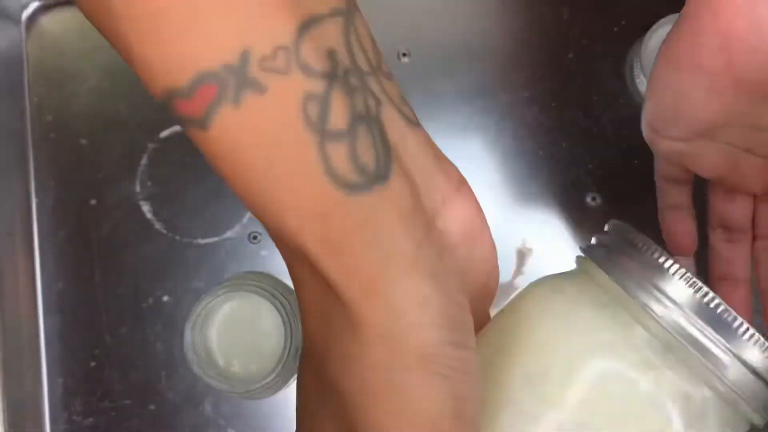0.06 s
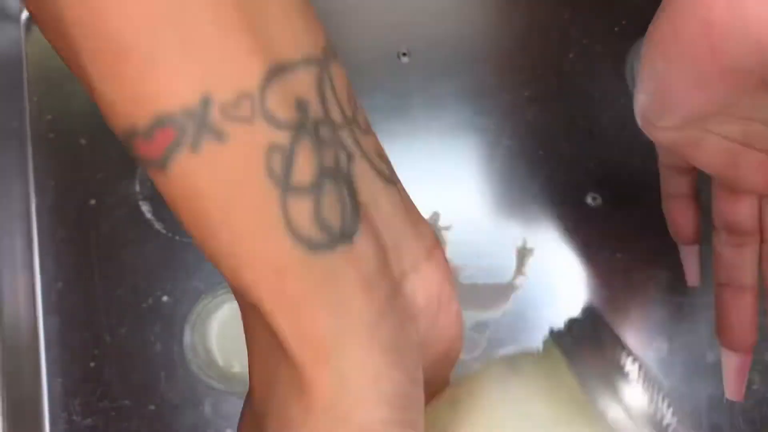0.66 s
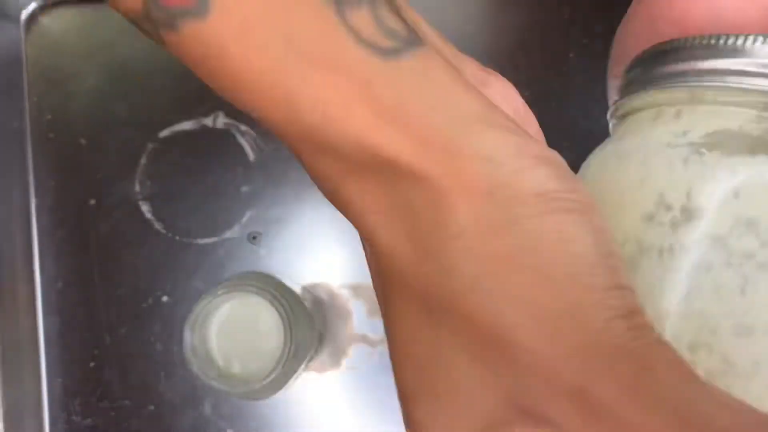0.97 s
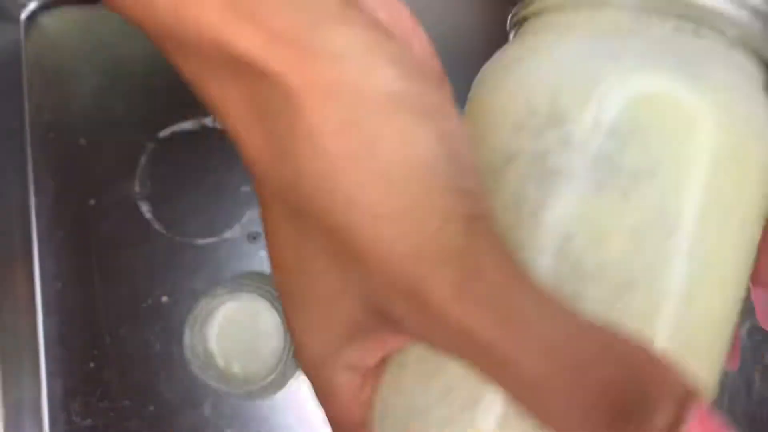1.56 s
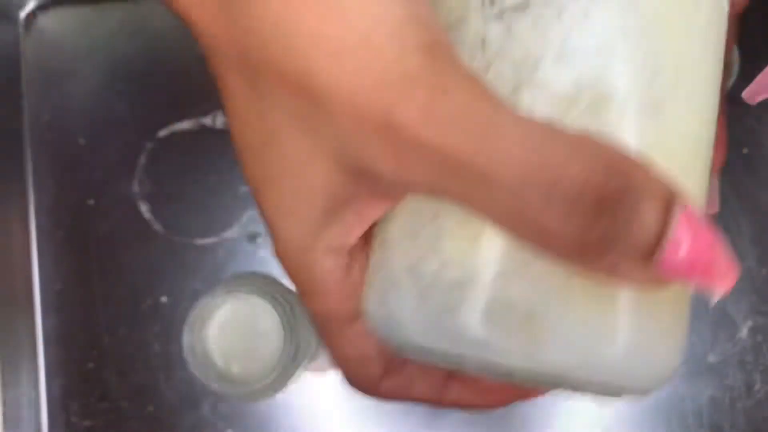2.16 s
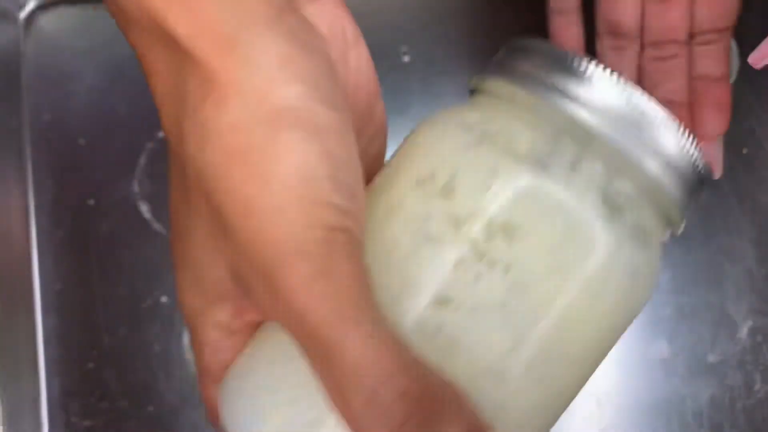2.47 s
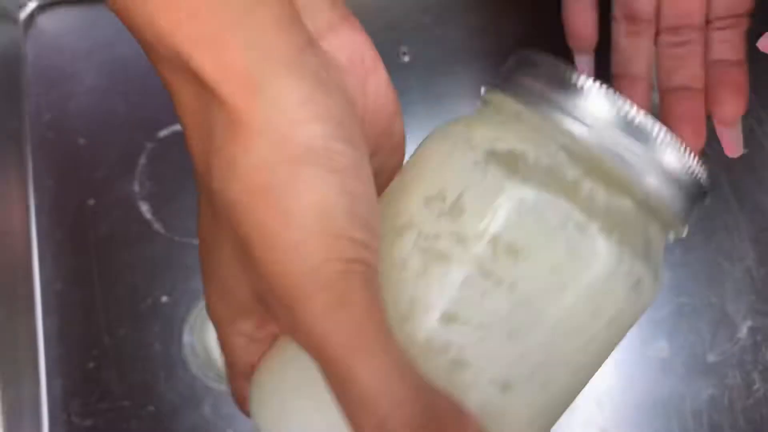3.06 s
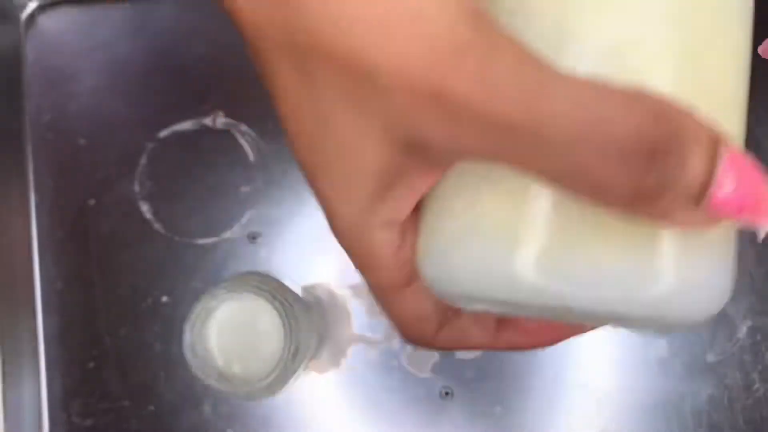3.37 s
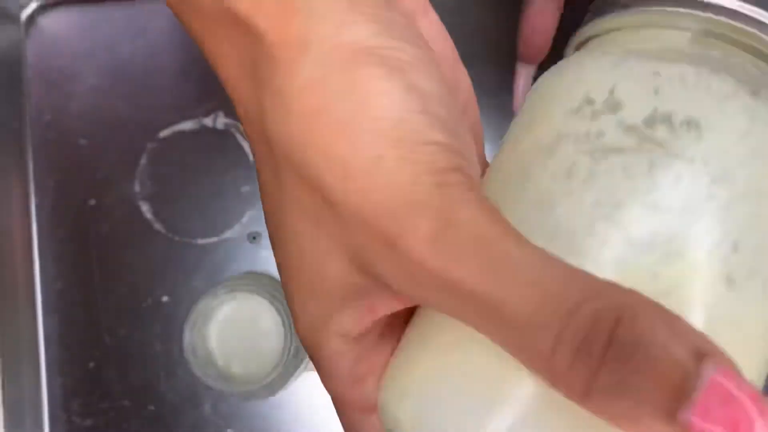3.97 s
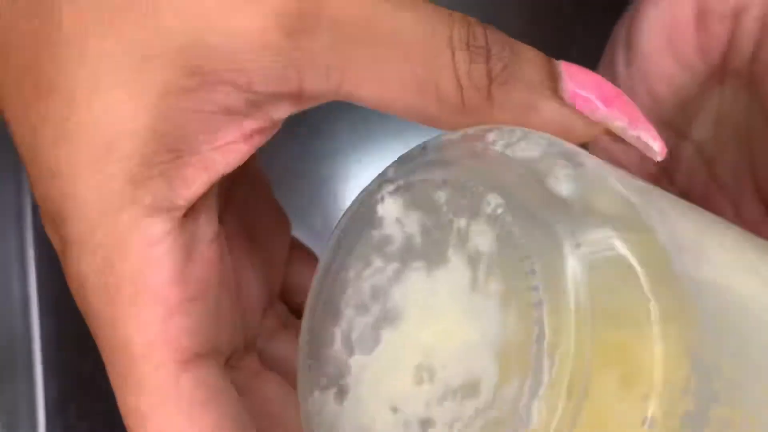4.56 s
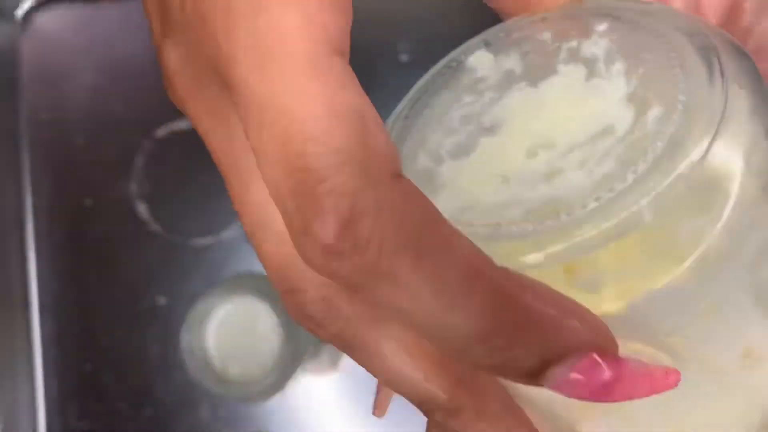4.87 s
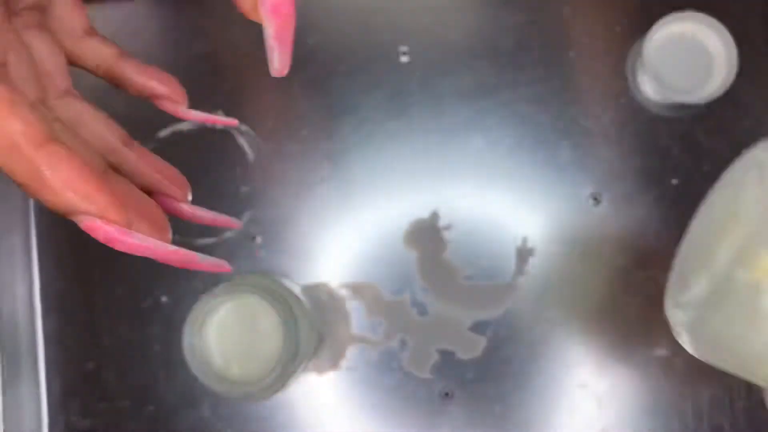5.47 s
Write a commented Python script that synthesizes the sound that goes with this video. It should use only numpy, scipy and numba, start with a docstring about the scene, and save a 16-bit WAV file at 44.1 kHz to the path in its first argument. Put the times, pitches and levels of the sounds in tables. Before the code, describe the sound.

Water with a soft lump in it is shaken hard in a glass jar, close by, about five strokes a second. It splashes and glugs with a hollow swooping note while the lump knocks on glass and lid and a steel sink bumps dully. After about four seconds the shaking stops, fingernails tick on the jar, and the contents slide wetly as it tips. A small kitchen hums faintly.

```python
"""Cold water with a soft lump in it is shaken hard in a glass jar, which is then turned and tipped.
Each stroke throws spray, snapping drops and glugs, and squeezes the air pocket, a resonator whose
hollow note swoops up and down. The lump knocks on glass and lid, a few bubbles pop softly, and nails
tick on the jar. Dull bumps sound from the steel sink, and a small kitchen reverberates over a low hum."""
import sys
import numpy as np
from scipy import signal
from scipy.fft import rfft, irfft, next_fast_len
from scipy.io import wavfile
from scipy.ndimage import uniform_filter1d
from numba import njit

SR = 44100
rng = np.random.default_rng(int(sys.argv[2]) if len(sys.argv) > 2 else 0)


def transcribe(u):
    """Save the signal u as a 16-bit wav file named by the first command-line argument.

    u: samples, shape (n,) or (channels, n), limited to [-1, 1]; the rate is SR.
    q: integer samples, one column per channel.
    """
    v = np.clip(np.atleast_2d(u).T, -1, 1)
    q = np.round(v * 32767).astype(np.int16)
    wavfile.write(sys.argv[1], SR, q)


N = 251811
TIME = np.arange(N) / SR

# One to-and-fro of the jar. Each row: time in seconds, spray level in dB and rise in seconds of the
# forward splash, then the same three for the return splash.
SHAKES = [(0.083, -61, 0.012, 0.2, -44, 0.0092), (.32, -41, 0.022, 0.35, -34.5, 0.0073),
          (0.527, -45.5, 0.021, 0.5, -47.5, 0.003), (.714, -42.5, 0.034, 0.81, -33, 0.02),
          (0.893, -39, 0.019, 0.97, -36, 0.011), (1.074, -35, 0.01, 1.164, -36.5, 0.0082),
          (1.28, -38, 0.038, 1.337, -39.5, 0.019), (1.472, -42, 0.017, 1.7, -39.5, 0.012),
          (1.67, -53, 0.022, 1.76, -55, 0.01), (1.875, -42.5, 0.021, 1.99, -35, 0.022),
          (2.061, -42.5, 0.034, 2.152, -37, 0.0073), (2.27, -37, 0.02, 2.34, -42.5, 0.0073),
          (2.476, -39, 0.027, 2.556, -42, 0.009), (2.685, -40.5, 0.033, 2.755, -36, 0.011),
          (2.867, -39.5, 0.017, 2.968, -41, 0.032), (3.072, -36.5, 0.021, 3.154, -41.5, 0.0068),
          (3.267, -37.5, 0.013, 3.36, -42.5, 0.033), (3.482, -40.5, 0.034, 3.563, -38, 0.012),
          (3.677, -41, 0.028, 3.72, -60, 0.014), (3.871, -37, 0.011, 3.93, -82, .014)]
# Spectrum of the difference between left and right. Each row: frequency in Hz, gain in dB.
STEREO_WIDTH = [(60, -14), (300, -4), (700, -2), (1200, -3), (2100, 5), (4500, 5.5), (6500, 1), (16000, 0)]


def undb(db):
    """Amplitude ratio of a level in decibels."""
    return 10 ** (np.asarray(db) / 20)


def unit(x):
    """Normalisation to an rms of 1."""
    return x / np.sqrt(np.mean(x ** 2))


def curve(rows):
    """Linear interpolation in time between (seconds, value) rows."""
    return np.interp(TIME, *np.transpose(rows))


def across(rows, size, column=1):
    """Interpolation of a table at the FFT frequencies, on a logarithmic axis."""
    rows = np.array(rows, float)
    return np.interp(np.log(np.fft.rfftfreq(size, 1 / SR) + 1), np.log(rows[:, 0]), rows[:, column])


def colour(x, rows, size=4096):
    """Minimum-phase filter with a response given as (Hz, dB) rows."""
    cepstrum = irfft(np.log(undb(across(rows, size))))
    cepstrum[1:size // 2] *= 2
    cepstrum[size // 2 + 1:] = 0
    return signal.fftconvolve(x, irfft(np.exp(rfft(cepstrum))))[:len(x)]


def add(track, s, sound):
    """Superposition of a sound on a track, from `s` seconds on."""
    start = max(int(s * SR), 0)
    track[start:start + len(sound)] += sound[:max(N - start, 0)]


def fade(t, t60):
    """Exponential decay by 60 dB in `t60` seconds."""
    return np.exp(-np.log(1000) * t / t60)


def wander(size):
    """Random fluctuation of rms 1, smoothed over `size` samples."""
    return unit(uniform_filter1d(uniform_filter1d(rng.standard_normal(N), size), size))


def ring(hz, t60, rise, glide=0., size=8192):
    """A damped oscillator that builds up over `rise` seconds and shifts pitch by `glide` per t60."""
    t = TIME[:size]
    envelope = fade(t, t60) * (1 - np.exp(-t / rise))
    bend = 1 + glide * np.minimum(t / t60, 2) / 2
    return envelope / envelope.max() * np.sin(2 * np.pi * hz * t * bend)


def burst(rows, t60, size=8192):
    """A broadband transient: decaying, filtered noise with a peak of 1."""
    x = colour(rng.standard_normal(size) * fade(TIME[:size], t60), rows)
    return x / np.abs(x).max()


@njit
def resonate(x, hz, width_hz):
    """A second-order resonator whose centre frequency may move at every sample."""
    y, band_state, low_state = np.empty(len(x)), 0., 0.
    for i in range(len(x)):
        tuning, damping = np.tan(np.pi * hz[i] / SR), width_hz / hz[i]
        band = (band_state + tuning * (x[i] - low_state)) / (1 + tuning * (tuning + damping))
        band_state = 2 * band - band_state
        low_state += 2 * tuning * band
        y[i] = damping * band
    return y


def hollow(hz, width_hz, size=2048):
    """An air resonance driven by turbulent noise and held at an even level."""
    hz = np.full(N, hz, dtype=float)
    x = resonate(resonate(rng.standard_normal(N), hz, width_hz), hz, width_hz)
    return x / np.sqrt(uniform_filter1d(x ** 2, size) + 1e-18)


def hum():
    """Background noise of the kitchen: a gently swelling rumble and one wavering narrow-band note."""
    # Each row: frequency in Hz, level in dB.
    spectrum = [(20, -17), (50, -2), (85, 3.5), (120, -9.5), (190, -10), (270, -27.5), (400, -34.5),
                (700, -32.5), (1100, -33), (1400, -36), (2050, -30.5), (2800, -44), (5300, -50.5),
                (13000, -54)]
    mid, side = (undb(-53 + wander(size=3000)) * unit(colour(rng.standard_normal(N), spectrum))
                 for _ in range(2))
    side = undb(-1) * colour(side, STEREO_WIDTH)
    note = undb(-59) * hollow(84.3, width_hz=13., size=8192)
    return mid + note + np.array([side, -side])


def basin(x, t60, count=5):
    """Early reflections from the steel, whose interference pattern shifts as the jar moves over it."""
    # The small basin reflects mostly the upper range. Each row: frequency in Hz, gain in dB.
    reflectance = [(150, -12), (400, -8), (800, -1.5), (1600, -2.5), (5000, -3), (14000, 1)]
    t = TIME[:4096]
    shares = np.array([wander(size=1500) for _ in range(count)])
    shares /= np.sqrt(np.sum(shares ** 2, axis=0))
    out = np.zeros(N)
    for share in shares:
        echoes = rng.standard_normal(len(t)) * fade(t, t60) * (t > .0015)
        out += signal.fftconvolve(x * share, colour(echoes, reflectance))[:N]
    return out


def kitchen(x, t60, treble_t60, room_db, basin_db, basin_t60, size=22000):
    """Direct sound, early reflections and diffuse reverberation, as left and right."""
    t = TIME[:size]
    body = [(100, -1.5), (450, 1), (2500, -5.5), (6000, -14.5), (15000, -10)]
    treble = [(1500, -27), (6000, -9), (15000, -.5)]
    reflections = []
    for _ in range(2):
        low = colour(rng.standard_normal(size), body) * fade(t, t60)
        high = colour(rng.standard_normal(size), treble) * fade(t, treble_t60)
        room = signal.fftconvolve(x, (low + high) * (t > .006))[:N]
        reflections.append(undb(room_db) * room + undb(basin_db) * basin(x, basin_t60))
    side = colour(reflections[1], STEREO_WIDTH)
    return x + reflections[0] + np.array([side, -side])


def microphone_pair(pair):
    """Time and level differences: the left microphone is nearer, the right hears more midrange."""
    # Right against left. Each row: frequency in Hz, gain in dB, delay in milliseconds.
    differences = [(100, .4, 0), (400, -.6, 0), (860, 1.5, -.09), (1400, 3.2, 0), (2100, 7.5, .06),
                   (3200, 6.5, .12), (4000, 1.5, .08), (5000, 1.5, .11), (6000, 0, .153), (16000, 0, .153)]
    size = next_fast_len(N + 512)
    gain = undb(across(differences, size) / 2)
    lag_s = across(differences, size, column=2) / 1000
    delay = np.exp(-2j * np.pi * np.fft.rfftfreq(size, 1 / SR) * lag_s)
    return irfft(rfft(pair, size) * np.array([1 / gain, gain * delay]), size)[:, :N]


def sink_bumps(size=12000):
    """Plate vibration: a soft bump makes the steel boom and shudder, and its lowest mode hangs on."""
    # Each row: start in seconds, boom level in dB, boom pitch in Hz, shudder level in dB,
    # shudder decay time in seconds, level of the lowest mode in dB.
    bumps = [(.783, -45, 72, -49, 0.4, -58), (1.16, -28, 66, -32, 0.022, -46),
             (1.352, -31, 66, -41, 0.024, -52), (1.394, -30, 190, -40.5, 0.09, -44),
             (1.797, -37, 163, -41.5, 0.071, -61), (2.202, -33.5, 139, -40.5, .066, -42),
             (2.507, -22, 165.5, -28.5, 0.064, -31), (2.538, -24.5, 201.5, -33.5, 0.06, -28.5),
             (2.755, -22, 149, -29, 0.056, -27), (3.037, -24.5, 123, -32.5, 0.051, -36),
             (3.08, -27, 145, -38, 0.067, -48), (3.324, -19, 171.6, -29.5, 0.031, -22),
             (3.385, -32, 166.4, -35.5, 0.054, -38), (3.638, -29, 177, -36, 0.022, -38),
             (3.976, -35, 168, -41, 0.058, -50.5), (4.029, -37, 110, -45, .044, -38),
             (4.379, -43, 176, -45.5, 0.044, -44), (4.829, -32.5, 165.7, -40, 0.03, -40),
             (4.884, -42, 196, -45, 0.037, -41), (5.284, -51.5, 169.8, -47, 0.088, -50)]
    # Each row: frequency in Hz, level in dB.
    shudder_spectrum = [(12, -35), (30, -4), (55, -2.5), (85, 3), (115, 0.5), (150, 4), (220, 1),
                        (290, -17.5), (400, -24.5), (800, -62.5)]
    out, t = np.zeros(N), TIME[:size]
    for s, boom_db, hz, shudder_db, fall, deep_db in bumps:
        shudder = colour(rng.standard_normal(size) * np.exp(-t / fall), shudder_spectrum)
        onset_rms = np.sqrt(np.sum(shudder ** 2) / (fall * SR / 2))
        add(out, s, undb(shudder_db) * shudder / onset_rms)
        add(out, s, undb(boom_db) * ring(hz, t60=.06, rise=.014, glide=-.1))
        add(out, s, undb(deep_db) * ring(hz=85, t60=.21, rise=.011, size=16384))
    return out


def glass():
    """Free vibration of the filled jar: a sum of damped modes, slightly detuned at every blow."""
    # Each row: frequency in Hz, level in dB, t60 in seconds.
    modes = [(479.2, -28, 0.043), (540.6, -32.5, .16), (612, -31, 0.099), (741, -28.5, 0.16),
             (974, -34, 0.072), (1118, -27.5, 0.15), (1493, -29, .13), (1670, -30, 0.043), (1900, -31, .08),
             (1986, -26.5, 0.13), (2480, -34.5, .1), (2930, -30, 0.17), (3840, -42, .1)]
    return sum(undb(db) * ring(hz * (1 + .0084 * rng.standard_normal()), t60, rise=.00012)
               for hz, db, t60 in modes)


def nails():
    """Hard, brief contact: long nails give a bright tick and a faint ring of the glass."""
    # Each row: start in seconds, level in dB.
    ticks = [(4.4921, -42), (4.568, -50), (4.8466, -52.5), (5.2107, -31), (5.28, -42)]
    # Each row: frequency in Hz, level in dB.
    spectrum = [(500, -8), (900, -8.5), (2000, 1.5), (2500, -7.5), (4000, 6), (5200, 2.5), (7800, 10),
                (12000, 0), (16000, -15)]
    out = np.zeros(N)
    for s, db in ticks:
        add(out, s, undb(db) * (burst(spectrum, t60=.0069) + undb(-9) * glass()))
    return out


def knocks_and_pops(ordinary_db=-20, ring_db_per_db=.12):
    """Impulsive excitation: knocks of the lump on glass and lid, with a few soft bubble pops."""
    # Each row: start in seconds, level in dB, pitch in Hz, softness as a rise time in seconds,
    # relative thud level in dB. The rows at 0.7836 and 1.345 seconds are bubbles.
    events = [(0.3674, -9, 960, 0.00014, -1), (0.4022, -5.5, 1788, 0.00024, -1.5),
              (0.573, -17, 6440, 0.000066, -13.5), (.770, -21.5, 2150, 0.00016, -17.5),
              (0.7836, -22, 1597, 0.0034, -9), (.961, -20.5, 1620, 0.0013, -9),
              (1.0205, -30, 1460, 0.0005, -19.5), (1.071, -32, 3420, 0.0013, -37),
              (1.1499, -18, 1960, 0.00042, -8), (1.334, -15.5, 2260, 0.00099, -13),
              (1.345, -23, 1720, 0.0013, -32.5), (1.542, -24, 7370, 0.000085, -16),
              (1.5582, -21, 3113, 0.00042, -12), (1.597, -30, 2090, 0.00044, -24),
              (1.7562, -20, 3390, 0.00041, -36), (1.951, -26, 2230, 0.0012, -12),
              (2.1555, -24, 3196, 0.0011, -19), (2.5397, -30.5, 5170, 0.00019, -25),
              (2.737, -31, 2860, 0.00028, -37.5), (2.760, -32, 2440, 0.0017, -7),
              (2.946, -25.5, 3320, 0.00016, -28), (3.361, -25, 2950, 0.001, -23.5),
              (3.559, -25.5, 3420, 0.00026, -21.5), (3.7367, -29, 3820, 0.00021, -25),
              (4.1325, -43, 2080, 0.0015, -30.5), (4.15, -51.5, 2043, .0016, -30),
              (5.412, -38.5, 2287, 0.00049, -23), (5.568, -32, 1900, 0.001, -32),
              (5.6349, -26.5, 2270, 0.00033, -4)]
    # Each row: frequency in Hz, level in dB.
    crack_spectrum = [(100, -32), (400, 4.5), (1500, 0), (3500, 9.5), (4700, 6.5), (6200, -7),
                      (7500, -12.5), (10000, -10.5), (15000, -28)]
    out = np.zeros(N)
    for s, db, hz, soft, thud_db in events:
        # A soft event swells slowly, rings longer and cracks less.
        crack = undb(.5) / (1 + soft / .0021) * burst(crack_spectrum, t60=.013)
        smack_spectrum = [(hz / 4, -22), (hz * .65, -8), (hz, 0), (hz * 1.4, -10), (hz * 3, -28)]
        smack = undb(-4) * burst(smack_spectrum, t60=.018)
        ping = undb(.5) * ring(hz, t60=.005 + 5 * soft, rise=soft, glide=-.08)
        jar = undb(ring_db_per_db * (db - ordinary_db)) * glass()
        # A heavy blow also pushes the lid and the water behind it.
        thud = (undb(-2) * ring(330, t60=.025, rise=.0035, glide=-1.)
                + undb(-7) * ring(600, t60=.011, rise=.0013, glide=-.5)
                + undb(-13) * ring(150, t60=.03, rise=.004))
        cavity = undb(-27) * (ring(270, t60=.3, rise=.004) + ring(400, t60=.12, rise=.004))
        add(out, s, undb(db) * (ping + crack + smack + jar))
        add(out, s + .0024, undb(db + thud_db) * (thud + cavity))
    return out


def droplets(per_s, spread_db, clump_db):
    """Shot noise: dense tiny impacts of uneven size, arriving in clumps of a few milliseconds."""
    # Each row: frequency in Hz, level in dB.
    spectrum = [(300, -17.5), (1000, -5), (2000, -5.5), (3200, -1.5), (4000, 3.5), (5000, 0), (5900, -5.5),
                (7300, -1.5), (8300, -3.5), (9700, -11), (13000, -9.5), (15500, -34)]
    hits = (rng.random(N) < per_s / SR) * rng.standard_normal(N)
    sizes = undb(spread_db * np.minimum(rng.exponential(size=N), 4))
    clumps = undb(clump_db * unit(uniform_filter1d(rng.standard_normal(N), 130)))
    return unit(colour(hits * sizes * clumps, spectrum))


def bubbles(low_hz, high_hz, cycles, spread_db, glide, count):
    """Bubble resonance: air folded into the water pulsates in short, slightly rising pings."""
    out = np.zeros(N)
    for when, note, loud, life in rng.random((count, 4)):
        hz = low_hz * (high_hz / low_hz) ** note
        size_db = -spread_db * np.log(loud + .05)
        ping = ring(hz, t60=cycles * (.5 + life) / hz, rise=.00013, glide=glide, size=1536)
        add(out, when * N / SR, undb(size_db) * ping)
    return unit(out)


def clouds(x, patchy_db, count=12, size=2 ** 18):
    """Band-wise modulation: drops and bubbles come in clouds of like size, so each band swells alone."""
    place = across([(1000, 0), (14000, count - 1)], size)
    spectrum = rfft(x, size)
    bands = (irfft(spectrum * np.maximum(1 - np.abs(place - k), 0))[:N] for k in range(count))
    return sum(band * unit(undb(patchy_db * wander(size=420))) for band in bands)


def slide():
    """Flow noise: the tipped contents run along the glass in one rough, crackling stream."""
    # Each row: time in seconds, level in dB.
    levels = [(5.2, -100), (5.29, -64), (5.39, -83), (5.415, -51), (5.44, -51.5), (5.48, -61.5),
              (5.53, -61), (5.57, -43.5), (5.625, -54.5), (5.64, -41.5), (5.67, -43.5), (5.71, -49.5)]
    # Each row: frequency in Hz, level in dB.
    spectrum = [(150, -26), (330, -7.5), (490, -19), (660, -6), (880, -15), (1120, -9.5), (1400, -16),
                (1650, -8.5), (1870, -4), (2200, -7), (3400, -15.5), (4200, -7.5), (5000, -11),
                (7200, -13.5), (13000, -25.5), (15500, -36)]
    grain = rng.standard_normal(N) * undb(3 * wander(size=110))
    stream = clouds(unit(colour(grain, spectrum)), patchy_db=3.5)
    crackle = bubbles(2200, 6000, cycles=4, spread_db=7, glide=.1, count=1400)
    return undb(curve(levels)) * (stream + undb(-7) * crackle)


def slaps():
    """Air entrainment: a sheet of water lands flat on the wall with a smack and traps a bubble."""
    # Each row: start in seconds, level in dB, pitch in Hz.
    landings = [(0.227, -28.5, 1390), (0.621, -28, 1056), (.655, -28.5, 1020), (.821, -29, 567),
                (1.022, -24, 714), (1.202, -26.5, 636), (1.306, -27, 564), (1.464, -19.5, 567),
                (1.799, -26, 1050), (1.87, -26, 684), (2.422, -30.5, 1066), (2.607, -29, 1076),
                (2.804, -27.5, 1115), (3.073, -41, 580), (3.203, -24.5, 683), (3.479, -29.5, 960),
                (3.862, -29.5, 573), (5.578, -39, 635), (5.661, -33, 643)]
    out = np.zeros(N)
    for s, db, hz in landings:
        spectrum = [(hz / 4, -18), (hz * .41, -3), (hz, 0), (hz * 2, -7), (hz * 5, -24), (16000, -55)]
        smack = undb(-3) * burst(spectrum, t60=.036)
        bubble = undb(-7.5) * ring(hz, t60=.04, rise=.00067, glide=.15)
        add(out, s, undb(db) * (smack + bubble))
    return out


def gulps(top_hz=1107.5):
    """Cavity resonance: the air space rings as the water slams shut."""
    # Each row: start in seconds, level of the top note in dB, relative level of the low modes in dB.
    closures = [(.53, -41, -9), (.704, -36, -10), (.901, -35.5, -18), (1.268, -34.5, -2.5),
                (1.309, -42.5, 7.5), (1.477, -34, -0.5), (2.674, -29, -11), (2.872, -44.5, 5.5),
                (3.07, -36.5, 7.5), (3.112, -31.5, -13), (3.29, -55, 14), (3.345, -56, 13), (3.485, -44, 5),
                (3.704, -35, 0.5), (3.858, -51, 9)]
    # Each row: frequency in Hz, level in dB, t60 in seconds.
    low_modes = [(455, -3.5, 0.23), (572, -4.5, 0.16), (744, -4, 0.061)]
    out = np.zeros(N)
    for s, db, low_db in closures:
        detune = 1 + .012 * rng.standard_normal()
        low = sum(undb(mode_db) * ring(hz * detune, t60, rise=.0029) for hz, mode_db, t60 in low_modes)
        top = ring(top_hz * detune, t60=.059, rise=.045, glide=-.04)
        add(out, s, undb(db) * (top + undb(low_db) * low))
    return out


def glugs(size=6000):
    """Air forced through the water oscillates, rising in pitch when squeezed and falling when let go."""
    # Each row: centre in seconds, level in dB, pitch in Hz, half length in seconds, glide as a share
    # of the pitch per second.
    swoops = [(.01, -38, 360, 0.0083, -7), (0.098, -44.5, 300, 0.019, 12),
              (0.496, -32.5, 281.6, 0.0074, 8.5), (0.531, -35, 407.6, 0.0098, 5),
              (0.701, -35.5, 389, 0.023, 8.5), (0.901, -36, 388, 0.019, 7.5),
              (1.283, -33.5, 418.3, 0.018, 4.5), (1.467, -31, 382, 0.011, 7.5),
              (1.56, -40.5, 325, 0.035, -6), (1.673, -44, 410, 0.039, 5.5),
              (1.986, -45.5, 248.6, 0.039, -4), (2.038, -30.5, 251.2, 0.0093, 8),
              (2.06, -32.5, 387.3, 0.02, 7.5), (2.179, -48, 339.6, 0.026, -9.5),
              (2.273, -42.5, 348, 0.012, 16), (2.363, -44.5, 378, 0.017, -8.5),
              (2.686, -44.5, 391.5, 0.014, 5.5), (2.865, -37, 361.4, 0.011, 14),
              (2.986, -42.5, 312, 0.038, -9), (3.085, -35, 400.4, 0.021, 7),
              (3.211, -35, 243.2, 0.021, -11.5), (3.276, -44, 315, 0.015, 18),
              (3.582, -42, 324.3, 0.02, -9.5), (3.69, -39.5, 402, 0.017, 9), (3.873, -35.5, 350, 0.018, 11),
              (5.604, -49.5, 388, 0.039, 2.5)]
    out, t = np.zeros(N), TIME[:size] - TIME[size // 2]
    waver, flutter = wander(size=110), wander(size=140)
    for s, db, hz, half, glide in swoops:
        here = slice(int(s * SR), int(s * SR) + size)
        shake, throb = np.resize(waver[here], size), np.resize(flutter[here], size)
        phase = 2 * np.pi * np.cumsum(hz * np.exp(glide * t + .035 * shake)) / SR
        note = np.sin(phase) * undb(1.5 * throb)
        gargle = np.sin(1.9 * phase) * undb(-14 + 3 * shake)
        glug = undb(db) * np.exp(-(t / half) ** 2) * (note + gargle)
        start = s + t[0]
        add(out, start, glug[max(int(-start * SR), 0):])
    return out


def snaps():
    """Drop impact: each large drop snaps against the glass, with a little spatter behind it."""
    # Each row: start in seconds, level in dB.
    drops = [(0.185, -28.5), (.2458, -33), (.368, -16.5), (0.529, -24), (0.5714, -25), (0.7692, -18.5),
             (0.886, -23), (0.948, -23), (.9615, -22), (1.1503, -19), (1.333, -26.5), (1.464, -27.5),
             (1.5416, -18), (1.601, -39), (1.668, -24.5), (1.72, -35), (1.7551, -28), (1.9270, -23.5),
             (2.0324, -39), (2.1554, -24), (2.336, -44), (2.362, -26), (2.4899, -21), (2.5397, -25),
             (2.7375, -21.5), (2.8698, -18), (2.947, -26), (3.12, -24), (3.29, -24.5), (3.448, -41),
             (3.690, -26), (3.7366, -20.5), (3.8012, -43), (3.848, -33.5), (3.907, -38)]
    # Each row: frequency in Hz, level in dB.
    spectrum = [(600, -16), (2000, -5.5), (3800, 1.5), (5000, -2.5), (7200, 6), (9000, -2), (13000, -9.5),
                (16000, -14)]
    out = np.zeros(N)
    for s, db in drops:
        add(out, s, undb(db) * (burst(spectrum, t60=.007) + undb(-13.5) * burst(spectrum, t60=.049)))
    return out


def splashes(ordinary_db=-38, froth_db_per_db=.15, shorter_per_db=.17):
    """Forced sloshing: two splashes per shake, the harder ones frothing more and draining sooner."""
    forward, back = (.028, -43), (.033, -45.5)  # an ordinary splash: fall in seconds, bubbles in dB
    for shake in SHAKES:
        for (s, db, rise), (fall, bubble_db) in (shake[:3], forward), (shake[3:], back):
            excess_db = db - ordinary_db
            froth_db = min(bubble_db + froth_db_per_db * excess_db, db + 4)
            yield s, db, froth_db, rise, fall * np.exp(-shorter_per_db * max(excess_db, 0))


def lulls(depth_db=-9, lead_s=.017, width_s=.019):
    """Free flight: the water hangs in the air just before it lands, and the level dips."""
    dip = sum(np.exp(-((TIME - s + rise + lead_s) / width_s) ** 2) for s, _, _, rise, _ in splashes())
    return undb(depth_db * dip)


def flow():
    """Envelopes of spray and froth: the splashes and the churn are incoherent, so their powers add."""
    # Water running about between splashes. Each row: time in seconds, level in dB.
    churn_levels = [(0, -43), (.04, -54), (.17, -49), (.3, -46), (1.5, -45.5), (3.1, -46.5), (3.88, -47),
                    (3.94, -79), (4.2, -86.5), (5.71, -82)]
    churn = undb(curve(churn_levels)) * lulls()
    spray_power, froth_power = (undb(1.5) * churn) ** 2, (undb(4) * churn) ** 2
    for s, spray_db, froth_db, rise, fall in splashes():
        breaking = (np.maximum(s - TIME, 0) / rise) ** 4
        draining = (np.maximum(TIME - s, 0) / fall) ** 1.25
        swell = np.exp(-breaking - draining)
        spray_power += (swell * undb(spray_db)) ** 2
        froth_power += (swell * undb(froth_db)) ** 2
    return np.sqrt(spray_power), np.sqrt(froth_power)


def squeeze(lead_s=.034, longest_s=.22, skew=.7):
    """Compression of the air pocket: one arch per shake, from 0 to about 1 and back."""
    starts = np.array(SHAKES)[:, 0] - lead_s
    lengths = np.minimum(np.diff(starts, append=np.inf), longest_s)
    out = np.zeros(N)
    for s, length in zip(starts, lengths):
        depth = 1 + .08 * rng.standard_normal()
        add(out, s, depth * np.sin(np.pi * np.linspace(0, 1, int(length * SR)) ** skew))
    return out


def air_pocket(drive, slack_hz=218.6, squeezed_hz=452, choke=.77):
    """An air spring: the pocket's note is higher and more choked the harder it is squeezed."""
    compression = squeeze()
    pitch = slack_hz + (squeezed_hz - slack_hz) * compression
    wavering_hz = pitch * (1 + .02 * wander(size=300))
    tone = unit(np.sin(2 * np.pi * np.cumsum(wavering_hz) / SR) * undb(2.4 * wander(size=500)))
    turbulence = undb(-8) * hollow(pitch, width_hz=110.)
    openness = 1 - choke * np.minimum(compression, 1) ** 4
    overtone = undb(-20) * hollow(1.6 * pitch, width_hz=160.)
    return drive * (undb(-5) * openness * unit(tone + turbulence) + overtone)


def water():
    """Sloshing drives drop impacts, bubble resonances and the air pocket, over a lingering low ring."""
    # The low ring while the jar is held by its side. Each row: time in seconds, level in dB.
    ring_levels = [(0, -54), (.76, -52.5), (.93, -41.5), (1.2, -45.5), (1.36, -46), (1.7, -110)]
    spray, froth = flow()
    hiss = undb(-3.5) * droplets(per_s=8000, spread_db=2.8, clump_db=2.6)
    foam = undb(-9) * bubbles(6000, 8300, cycles=45, spread_db=4, glide=.02, count=2600)
    fizz = undb(-7.5) * bubbles(1770, 3700, cycles=16, spread_db=3.5, glide=.12, count=2000)
    crackle = undb(-12.5) * bubbles(1280, 4000, cycles=1.6, spread_db=6.5, glide=.1, count=1200)
    spatter = undb(-8) * droplets(per_s=280, spread_db=3.8, clump_db=2)
    splash = spray * (clouds(hiss + foam + fizz + crackle, patchy_db=3.3) + spatter)
    gurgle = undb(-8) * froth * bubbles(560, 2300, cycles=20, spread_db=3, glide=.15, count=2200)
    # Smoothing keeps the pocket sounding between splashes.
    drive = uniform_filter1d(froth, size=3400) * np.sqrt(lulls())
    swirl = undb(-9.5) * drive * hollow(260, width_hz=240.)
    low_ring = undb(curve(ring_levels)) * hollow(294, width_hz=12.)
    return splash + gurgle + air_pocket(drive) + swirl + low_ring


def scene():
    """Superposition of jar and sink, their reflections in the kitchen, and the hum."""
    direct = water() + snaps() + glugs() + slaps() + gulps() + slide()
    direct += knocks_and_pops() + nails() + sink_bumps()
    room = kitchen(direct, t60=.37, treble_t60=.23, room_db=-40.5, basin_db=-23.5, basin_t60=.023)
    return microphone_pair(room) + hum()


def record(dry):
    """Filtering and saturation: the phone colours the treble, rounds hard peaks and cuts the top."""
    # The microphone has a notch in the treble. Each row: frequency in Hz, gain in dB.
    response = [(4000, 0), (8700, 0.5), (9250, -3.5), (9650, -17), (10100, -13.5), (10600, 1.5),
                (13600, -1.5), (14600, -8.5), (16000, -16)]
    ceiling, top_hz = .88, 15500
    heard = np.array([colour(channel, response) for channel in dry])
    rounded = heard / (1 + (heard / ceiling) ** 4) ** .25
    return signal.sosfilt(signal.ellip(8, .2, 70, top_hz, fs=SR, output="sos"), rounded)


dry = scene()
out = record(dry)
transcribe(out)
```